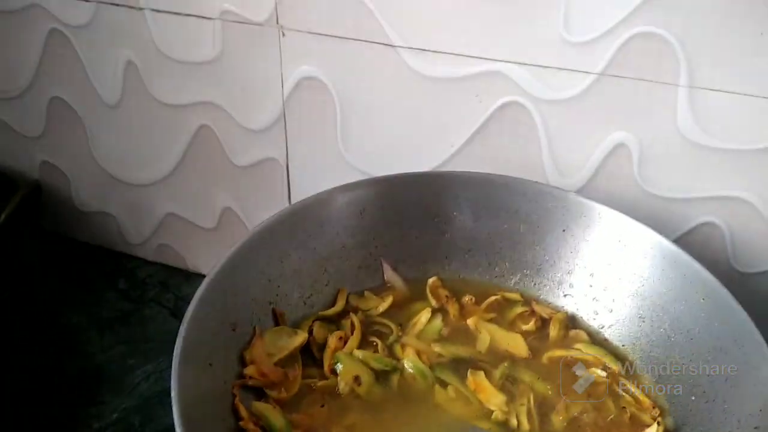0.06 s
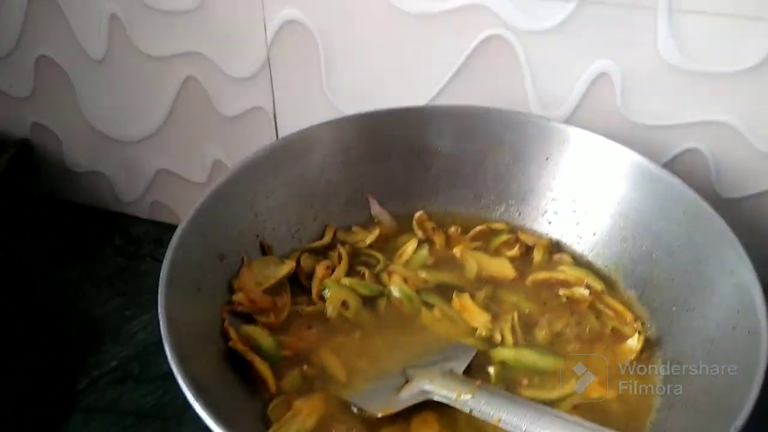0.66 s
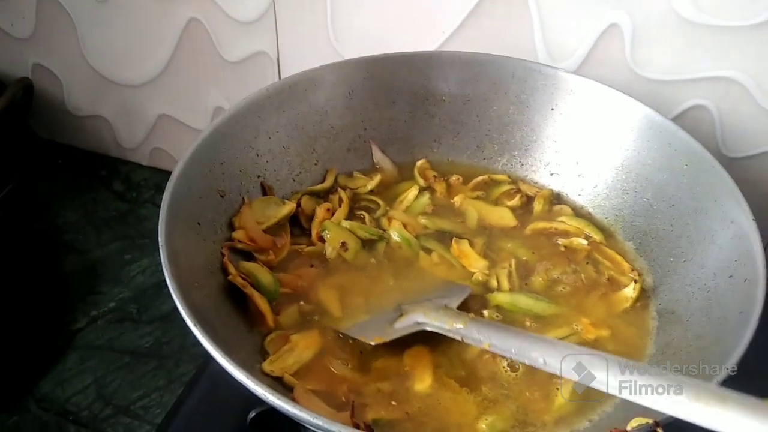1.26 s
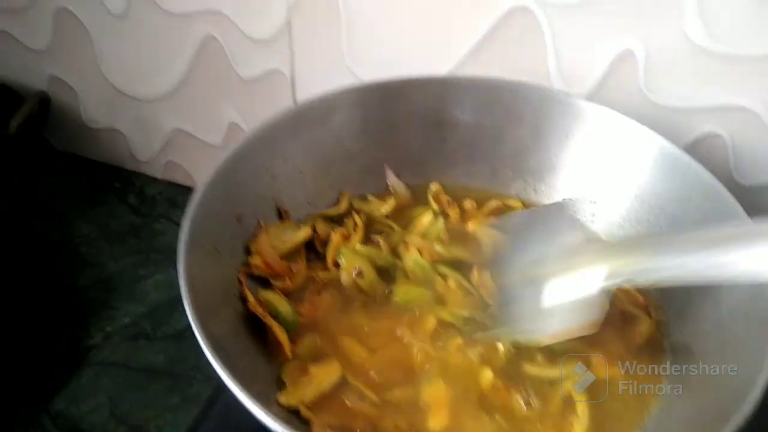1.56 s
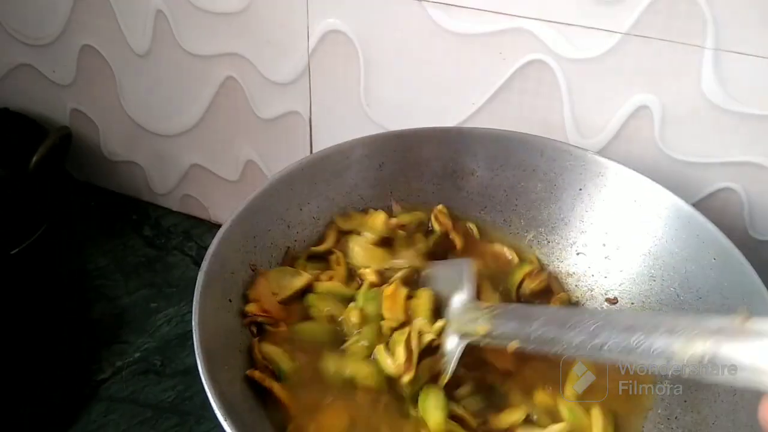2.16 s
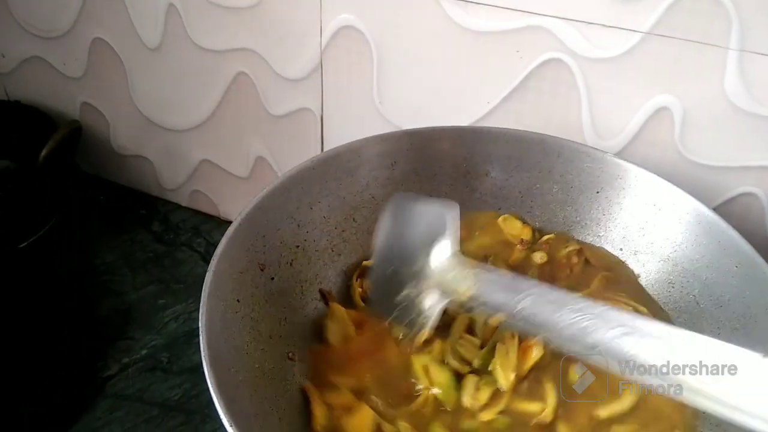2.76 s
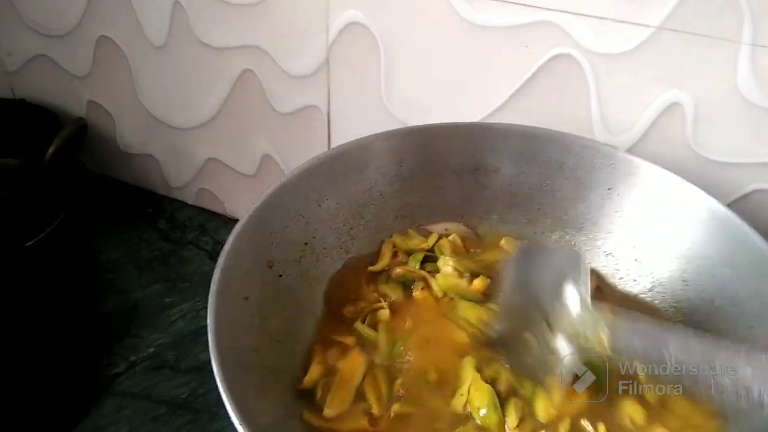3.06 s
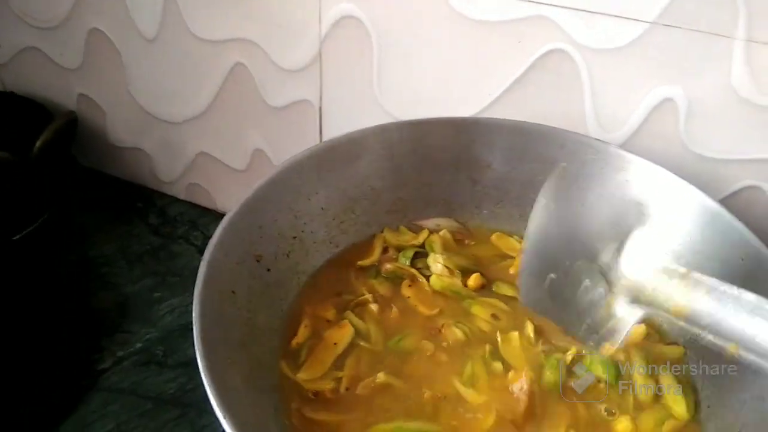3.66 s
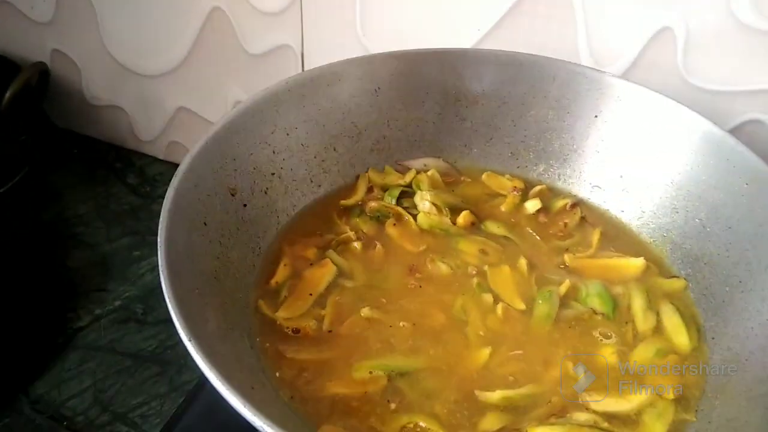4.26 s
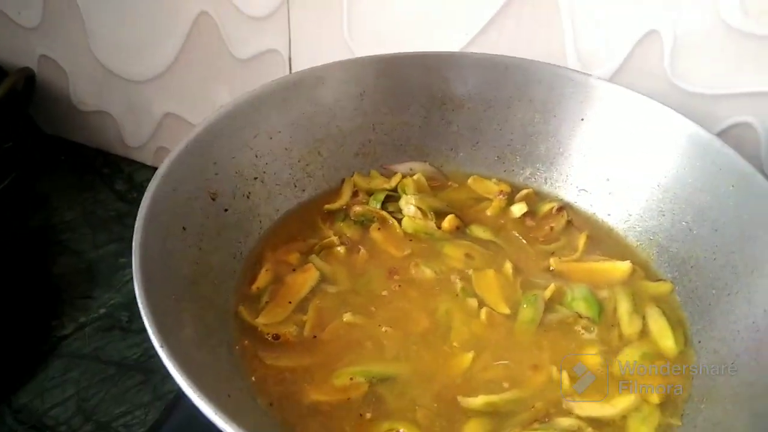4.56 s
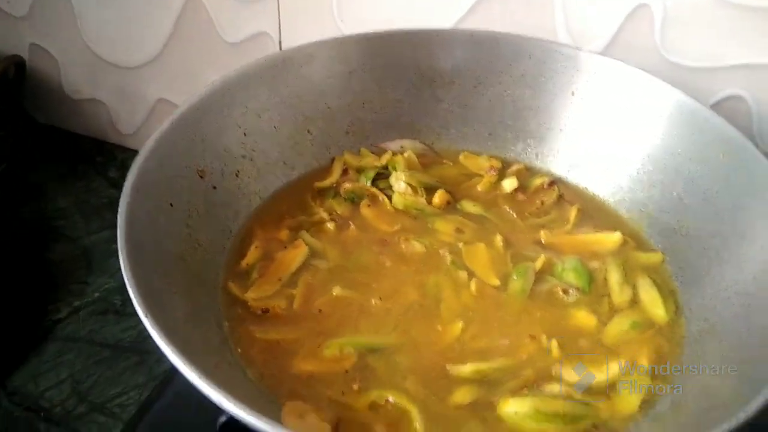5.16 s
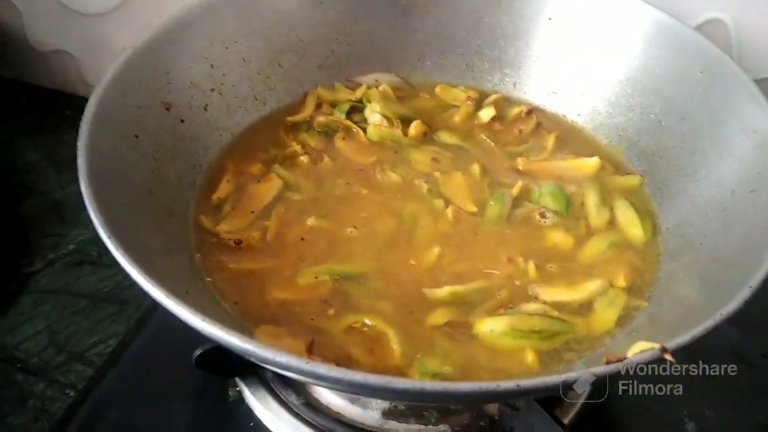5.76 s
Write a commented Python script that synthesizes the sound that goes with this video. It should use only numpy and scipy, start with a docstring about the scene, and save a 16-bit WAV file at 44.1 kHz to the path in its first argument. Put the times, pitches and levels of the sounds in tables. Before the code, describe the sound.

Watery gravy hisses and sizzles in a hot metal pan while a steel spatula clinks, stirs and knocks sharply against it.

```python
"""A tiled kitchen, with a stereo microphone close to a hot metal pan of vegetables in watery gravy.
Tiny steam bubbles hiss and larger ones crackle, both easing as the gravy cools the pan.
A steel spatula clinks, pushes the food and knocks on the pan floor; the hiss flares where gravy
washes onto bare metal. Drops spit and the pan bumps and rubs softly. Farther off, the walls
echo briefly and a mains hum runs underneath."""
import sys
import numpy as np
from scipy import signal
from scipy.fft import rfft, irfft, next_fast_len
from scipy.io import wavfile
from scipy.ndimage import uniform_filter1d, map_coordinates

SR = 44100
rng = np.random.default_rng(int(sys.argv[2]) if len(sys.argv) > 2 else 0)


def unload_wav(signal):
    """Save mono or channel-first audio to the path in sys.argv[1] as 16-bit WAV at rate SR, clipped to [-1, 1]."""
    wavfile.write(
        sys.argv[1],
        SR,
        np.round(np.clip(np.atleast_2d(signal).T, -1, 1) * 32767).astype(np.int16),
    )


N = 264996


def amp(db):
    """Decibels to gain."""
    return 10 ** (np.asarray(db) / 20)


def unit(x):
    """Scale to rms 1."""
    return x / np.sqrt(np.mean(x ** 2) + 1e-20)


def along(points, hz):
    """Read (frequency [Hz], value) points on a log axis."""
    freqs, values = np.transpose(points)
    return np.interp(np.log(hz + 1), np.log(freqs), values)


def noise(count=N):
    """Two white noises."""
    return rng.standard_normal((2, count))


def wobble(rate, count=N):
    """A smooth random curve with `rate` knots a second."""
    return map_coordinates(rng.standard_normal(1024), [np.arange(count) * rate / SR], mode="wrap")


def swell(at, rise, fall):
    """A smooth hump of height 1 at time `at`, with its own rise and fall times, all in seconds."""
    t = np.arange(N) / SR - at
    return np.exp(-0.5 * (t / np.where(t < 0, rise, fall)) ** 2)


def add(track, at, sound):
    """Mix a sound into the track, starting `at` seconds in."""
    part = track[:, round(at * SR):][:, :sound.shape[-1]]
    part += sound[..., :part.shape[-1]]


def filtered(x, response):
    """Shape x by a gain that depends on frequency."""
    count = x.shape[-1]
    padded = next_fast_len(count + 8192)
    return irfft(rfft(x, padded) * response(np.fft.rfftfreq(padded, 1 / SR)), padded)[..., :count]


# how alike the microphone's two sides are: (frequency [Hz], coherence [0-1])
COHERENCE = [(30, 0.75), (130, 0.99), (290, 0.78), (640, 0.63), (1400, 0.18), (3000, 0), (14000, 0)]
# each band sounds a little louder on the left or the right: (frequency [Hz], left minus right [dB])
SIDE_BALANCE = [(100, -2.5), (300, 0.5), (700, -1), (1150, 1.5), (1420, -6), (1750, -1), (2050, -2.5),
                (3200, 2), (4300, 0.5), (5600, -3.5), (7200, 0.5), (8400, 4.5), (9600, -0.5), (14000, 0.5)]
def spread(pair):
    """Two unrelated signals become left and right: alike in the bass, unrelated in the treble."""
    mid, side = filtered(pair, lambda hz: np.array([np.cos(side_angle(hz)), np.sin(side_angle(hz))]))
    left_right = np.array([mid + side, mid - side])
    return filtered(left_right, lambda hz: amp(np.outer([0.5, -0.5], along(SIDE_BALANCE, hz))))


def side_angle(hz):
    """The turn from mid towards side, in radians, that gives the coherence at this frequency."""
    return np.arccos(np.clip(along(COHERENCE, hz), -1, 1)) / 2


def coloured(pair, spectrum):
    """A stereo signal of rms 1 shaped by the given spectrum."""
    return unit(filtered(spread(pair), lambda hz: amp(along(spectrum, hz))))


def resonant(pair, centre_hz, width):
    """A stereo signal of rms 1 in one resonance; width is a share of its frequency."""
    return unit(filtered(spread(pair), lambda hz: 1 / (1 + ((hz - centre_hz) / (width * centre_hz)) ** 2)))


def bursts(per_second, scatter_db):
    """Tiny pops at random moments, with scattered sizes and directions."""
    fires = rng.random(N) < per_second / SR
    size = amp(scatter_db * np.clip(rng.standard_normal(N), -2, 2))
    return unit(fires * size * noise())


def patchy(pair, depth_db):
    """Let narrow bands swell and sink for moments, each on its own."""
    bands = signal.stft(pair, nperseg=512)[2]
    patches = uniform_filter1d(rng.standard_normal(bands.shape[1:]), size=4, axis=0)
    patches = uniform_filter1d(patches, size=9, axis=1)
    return signal.istft(bands * amp(depth_db * unit(patches)), nperseg=512)[1][:, :N]


def tone(hz, waver_db, drift_rad):
    """A sine of rms about 1 that wavers in level and phase."""
    phase = 2 * np.pi * hz * np.arange(N) / SR + drift_rad * wobble(9.9)
    return amp(waver_db * wobble(18)) * np.sqrt(2) * np.sin(phase)


def mains_hum(start_db=-46, growth_db_per_s=0.36, fade_at=5.84, fade_db_per_s=100):
    """The mains hum behind the pan grows slowly and fades fast at the very end."""
    t = np.arange(N) / SR
    level_db = start_db + growth_db_per_s * t - fade_db_per_s * np.maximum(t - fade_at, 0)
    return amp(level_db) * tone(hz=100, waver_db=0.7, drift_rad=0.065)


# the air all round the microphone: (frequency [Hz], spectral level [dB])
AIR_SPECTRUM = [(20, 8), (42, -4), (68, -3.5), (130, 3), (170, -3.5), (210, 0), (290, -9.5), (390, -8),
                (520, -10), (620, -11.5), (900, -25), (2500, -23)]
# faint drones in the room: (frequency [Hz], level [dB])
ROOM_DRONES = [(68.5, -63), (205, -64), (269, -71.5), (366, -70), (420, -72.5)]
def room_tone(air_db=-52):
    """Faint drones waver over the low murmur of the kitchen's air."""
    drones = sum(amp(db) * tone(hz, waver_db=3, drift_rad=1) for hz, db in ROOM_DRONES)
    return drones + amp(air_db) * coloured(noise(), AIR_SPECTRUM)


# the kitchen's reverberation: (frequency [Hz], t60 [s])
WALL_DECAY = [(200, 0.62), (900, 0.37), (2500, 0.42), (6000, 0.38), (12000, 0.022)]
def tiled_walls(sound, build_up_s=0.004):
    """The walls beyond the pan answer with a tail that lasts longest in the bass."""
    hz, t, bands = signal.stft(noise(SR), SR, nperseg=256)
    decay = amp(-60 * t / along(WALL_DECAY, hz)[:, None])
    tail = spread(signal.istft(bands * decay, SR, nperseg=256)[1])
    tail *= 1 - np.exp(-np.arange(tail.shape[1]) / SR / build_up_s)
    return signal.fftconvolve(sound, tail / np.linalg.norm(tail[0]), axes=1)[:, :N]


# soft rubbing against the pan:
# (peak time [s], level [dB], frequency [Hz], width [ratio], rise [s], fall [s])
PAN_RUBS = [(.615, -48.5, 780, 0.17, 0.027, 0.037), (.62, -51.5, 250, 0.29, 0.013, 0.014),
            (.705, -50.5, 360, 0.048, 0.021, 0.028), (.71, -49.5, 285, 0.49, .025, 0.075),
            (5.195, -53, 645, 0.36, .02, 0.033), (5.85, -55, 379, 0.13, 0.072, 0.36)]
def rubs():
    """Gentle friction swells and fades in the low resonances of the pan."""
    return sum(amp(db) * swell(at, rise, fall) * resonant(noise(), hz, width)
               for at, db, hz, width, rise, fall in PAN_RUBS)


# bumps and plops at the pan: (time [s], level [dB], frequency [Hz], t60 [s], width [ratio])
PAN_BUMPS = [(4.366, -54.5, 1170, 0.41, 0.044), (4.37, -52, 650, 0.25, 0.64),
             (5.045, -46.5, 599, 0.22, 0.03), (5.055, -57, 854, 0.14, .08), (5.1, -48, 398, 0.17, 0.39),
             (5.215, -50, 474, 0.073, .15), (5.836, -41, 600, 0.021, 1), (5.837, -38, 1410, 0.039, 0.97)]
def bumps(attack_s=0.00072):
    """Each soft bump or plop dies away in one resonance."""
    out, t = np.zeros((2, N)), np.arange(SR // 2) / SR
    for at, db, hz, t60, width in PAN_BUMPS:
        envelope = amp(db - 60 * t / t60) * (1 - np.exp(-t / attack_s))
        add(out, at, envelope * resonant(noise(len(t)), hz, width))
    return out


# drops spitting near the microphone:
# (time [s], level [dB], frequency [Hz], t60 [s], spray's share of the power [0-1])
DROPS = [(.8699, -14, 10200, .009, .15), (.8702, -22.5, 6200, .007, .2), (.8744, -17.5, 9800, .005, .4),
         (1.2758, -26, 7230, .008, .4), (2.048, -22, 8000, .012, .5), (2.06, -22.5, 8500, .012, .5),
         (2.436, -30, 9800, .06, .8), (2.517, -27, 9000, .012, .5), (2.762, -21, 8300, .012, .4),
         (3.888, -29, 8530, .01, .4), (5.31, -33, 8280, .008, .4), (5.8275, -30, 6010, .008, .4)]
def spits(attack_s=0.00086, spray_width=0.19):
    """A drop bursts with a tiny clear ring and a puff of spray."""
    out, t = np.zeros((2, N)), np.arange(SR // 2) / SR
    for at, db, hz, t60, spray in DROPS:
        ring = np.sqrt(2 * (1 - spray)) * np.sin(2 * np.pi * hz * t)
        puff = np.sqrt(spray) * resonant(noise(len(t)), hz, spray_width)
        envelope = amp(db - 60 * t / t60) * (1 - np.exp(-t / attack_s))
        add(out, at, envelope * (ring + puff))
    return out


# the blade grating on the pan: (frequency [Hz], spectral level [dB])
SCRAPE_SPECTRUM = [(120, -30), (260, -8), (370, -2), (480, -8), (590, 1), (780, -8), (1040, 1), (1290, -7),
                   (1540, 3), (1800, -2), (3000, -4), (4100, 0), (6000, -5), (12000, -40)]
# the spatula pushes through the gravy: (peak time [s], level [dB], rise [s], fall [s])
SPATULA_STROKES = [(1.8, -51, 0.22, .2), (2.14, -39.5, 0.046, 0.045), (2.68, -46.5, 0.038, 0.1),
                   (2.9, -57, 0.044, 0.09), (3.4, -53.5, 0.079, 0.04)]
def stirring(catch_db=2.2):
    """Wet pieces slide and catch unevenly on the blade, which grates in the resonances of the pan."""
    grit = 0.6 * noise() + bursts(per_second=450, scatter_db=1.5)
    push = sum(amp(db) * swell(at, rise, fall) for at, db, rise, fall in SPATULA_STROKES)
    catches = amp(catch_db * wobble(rate=50))
    return push * catches * coloured(grit, SCRAPE_SPECTRUM)


# the pan floor's clack: (frequency [Hz], level [dB])
CLACK_MODES = [(620, -19), (1400, -7), (1680, -7), (2200, -16)]
# a knock's sharp crack and the dense ring after it: (frequency [Hz], spectral level [dB])
CRACK_SPECTRUM = [(100, -21), (220, -11), (420, -1), (1000, 3), (1600, 3), (2200, 3), (3000, -6),
                  (4300, -11), (5200, -1), (6900, 4), (8300, 2), (10000, -9), (14500, -15)]
RATTLE_SPECTRUM = [(120, -12), (250, -3), (350, 3), (520, 0), (680, 2), (980, 4.5), (1180, 4), (1430, 6.5),
                   (1750, 4), (2100, 5.5), (2800, -1.5), (3700, -2.5), (5000, -5), (7000, -9.5),
                   (12000, -16)]
# hard knocks of the blade on the pan floor: (time [s], level [dB], t60 of crack and clack [s])
BLADE_KNOCKS = [(2.016, -35, 0.044), (2.044, -39, 0.015), (2.151, -35.5, 0.024), (2.337, -42, .02),
                (2.616, -51, .025), (2.656, -32, 0.039), (2.924, -40, .02), (3.0031, -7, 0.01),
                (3.219, -40, .02), (3.343, -44, .02)]
def knocks(rattle_db=-17.5, rattle_t60=0.11, attack_s=0.00028):
    """The food damps the struck pan: a sharp crack, a short clack and a brief dense ring."""
    out, t = np.zeros((2, N)), np.arange(SR // 2) / SR
    clack = sum(amp(db) * np.sin(2 * np.pi * hz * t) for hz, db in CLACK_MODES)
    for at, db, t60 in BLADE_KNOCKS:
        crack = amp(-60 * t / t60) * (clack + coloured(noise(len(t)), CRACK_SPECTRUM))
        rattle = amp(rattle_db - 60 * t / rattle_t60) * coloured(noise(len(t)), RATTLE_SPECTRUM)
        add(out, at, amp(db) * (crack + rattle) * (1 - np.exp(-t / attack_s)))
    return out


# spatula and pan ringing together: (frequency [Hz], level [dB], free t60 [s], left minus right [dB])
STEEL_MODES = [(219, -25, 0.32, 1), (245, -25.5, 0.33, 3), (363, -26, 0.42, 6), (411, -34, 0.48, 5),
               (568, -26, 0.22, 0), (682, -16.5, 0.48, 2), (729, -12.5, 0.26, 3), (781, -21, .24, -3),
               (836, -21, 0.3, -5), (1090, -29, 0.3, -7), (1558, -21, 0.23, -7), (1930, -31, 0.44, 10),
               (2677, -10, 0.62, 5), (2940, -32, .16, 2), (5160, -20, .3, -8), (5336, 2, 0.34, -6),
               (5420, -8.5, .36, 9), (9070, -10.5, 0.23, -2), (10200, -15, 0.1, 2), (10340, -10, .2, 0)]
def steel_ring(t, t60_share, blade_above_hz=2300, rest_s=0.02, settle_s=0.009, mute_db=10.5):
    """The blade's high modes are muted as it comes to rest; the loaded pan's low modes waver."""
    ring, sides = np.zeros((2, len(t))), np.array([[1], [-1]])
    muting = amp(-mute_db * (1 + np.tanh((t - rest_s) / settle_s)) / 2)
    for hz, db, t60, lean_db in STEEL_MODES:
        # short waves reach the microphone's two sides out of step
        phase = 2 * np.pi * (hz * t + rng.random()) + sides * side_angle(hz)
        if hz > blade_above_hz:
            wave = muting * np.sin(phase)
        else:
            waver_db = 2.5 * wobble(rate=55, count=len(t))
            waver_rad = 0.55 * wobble(rate=55, count=len(t))
            wave = amp(waver_db) * np.sin(phase + waver_rad)
        ring += amp(db + sides * lean_db / 2 - 60 * t / (t60 * t60_share)) * wave
    return ring


# the thud of the jolted pan: (frequency [Hz], spectral level [dB])
THUD_SPECTRUM = [(90, -25), (150, -5.5), (220, 4.5), (340, 4), (480, -7), (580, 5), (700, 8), (1100, -9.5),
                 (1600, -1.5), (2100, -5), (2700, -5), (3500, -20), (5300, -17), (6500, -27), (10000, 3.5),
                 (11500, -32), (14500, -35)]
# the blade strikes, bounces and later grazes the pan:
# (time [s], level [dB], share of the free t60 [0-1], jolt to the pan [dB])
BLADE_CLINKS = [(.3145, -8, 0.17, -1), (0.3263, -11.5, 0.95, -9.5), (2.772, -46, 0.3, 0)]
def clinks(thud_db=-11, thud_t60=0.29, tick_db=-10, tick_t60=0.0062, attack_s=0.0004):
    """Close to the microphone, each contact jolts the loaded pan, ticks and rings the steel."""
    out, t = np.zeros((2, N)), np.arange(SR) / SR
    for at, db, t60_share, jolt_db in BLADE_CLINKS:
        thud = amp(thud_db + jolt_db - 60 * t / thud_t60) * coloured(noise(SR), THUD_SPECTRUM)
        tick = amp(tick_db - 60 * t / tick_t60) * noise(SR)
        ring = steel_ring(t, t60_share)
        add(out, at, amp(db) * (thud + tick + ring) * (1 - np.exp(-t / attack_s)))
    return out


# gravy washes onto bare metal and flashes to steam: (peak time [s], boost to the boiling [dB],
# swarm level [dB], swarm frequency [Hz], width [ratio], rise [s], fall [s])
STEAM_FLARES = [(0.1, 0.5, -37, 5600, 0.18, 0.26, 0.29), (2.06, 6.5, -35.5, 8050, .11, 0.045, 0.075),
                (2.75, 9, -38.5, 8800, 0.14, 0.077, 0.099), (3.37, 4, -44, 9200, 0.19, 0.37, 0.091),
                (3.88, 0.5, -44.5, 8800, 0.18, 0.41, 0.3)]
def flares():
    """A swarm of equally small bubbles swells and fades in a narrow band."""
    out = np.zeros((2, N))
    for at, _, db, hz, width, rise, fall in STEAM_FLARES:
        swarm = 0.98 * noise() + bursts(per_second=2500, scatter_db=-3.5)
        out += amp(db) * swell(at, rise, fall) * resonant(swarm, hz, width)
    return out


def boiling(flare_share, fresh_db=19, cooling_s=3.23):
    """Strength of the boiling as a gain: it sinks as the gravy cools the pan and rises at each flare."""
    heat_db = fresh_db * np.exp(-np.arange(N) / SR / cooling_s)
    flare_db = sum(boost_db * swell(at, rise, fall) for at, boost_db, *_, rise, fall in STEAM_FLARES)
    return amp(heat_db + flare_share * flare_db)


# larger bubbles heard in the pan's bowl: (frequency [Hz], spectral level [dB])
SIMMER_SPECTRUM = [(200, -40), (600, -9.5), (840, -0.5), (1130, -5.5), (1450, 4), (1730, -1), (1980, 4),
                   (2250, 2.5), (2560, 5), (3050, -9.5), (3650, 2), (4200, -21), (7000, -8.5)]
def simmer(settled_db=-58, flutter_db=1.6):
    """Larger bubbles burst in a crackle that follows the flares only a little."""
    crackle = noise() + 0.42 * bursts(per_second=1300, scatter_db=2)
    level = boiling(flare_share=0.31) * amp(settled_db + flutter_db * wobble(rate=25))
    return level * coloured(crackle, SIMMER_SPECTRUM)


# the hiss of the pan at close range: (frequency [Hz], spectral level [dB])
HISS_SPECTRUM = [(1200, -26.5), (2500, -13), (3800, -9), (5000, -4.5), (6200, -1.16), (7200, -0.95),
                 (8450, 1.6), (9400, 0), (11200, -5), (12500, -6), (14500, -13.5)]
def sizzle(settled_db=-47, flutter_db=0.9):
    """Countless tiny steam bubbles merge into a glittering hiss; the nearer ones stand out as fizz."""
    fizz = 0.5 * bursts(per_second=3000, scatter_db=2.5)
    steam = patchy(noise() + fizz, depth_db=1.4)
    level = boiling(flare_share=1) * amp(settled_db + flutter_db * wobble(rate=28))
    return level * coloured(steam, HISS_SPECTRUM)


def scene():
    """The pan and spatula up close, with their echoes and the room behind them."""
    steel = clinks()
    blows = knocks() + bumps()
    food = stirring() + spits() + rubs()
    echoes = tiled_walls(amp(-16) * steel + amp(-9.5) * (blows + food))
    cooking = sizzle() + flares() + simmer()
    return mains_hum() + room_tone() + echoes + food + blows + steel + cooking


def record(dry, top_hz=14450):
    """The recorder clips at full scale and keeps nothing above its band limit."""
    return filtered(np.clip(dry, -1, 1), lambda hz: hz < top_hz)


dry = scene()
out = record(dry)
unload_wav(out)
```